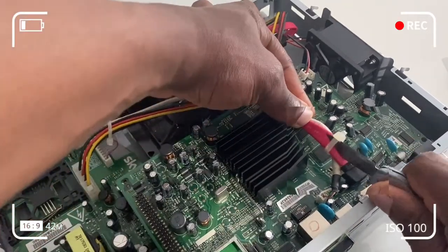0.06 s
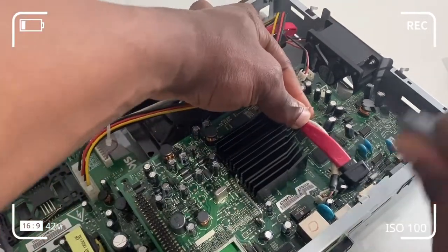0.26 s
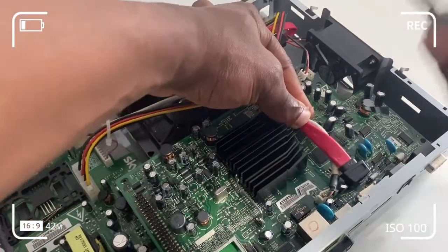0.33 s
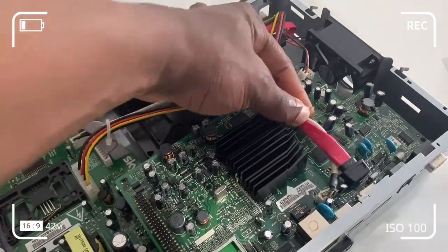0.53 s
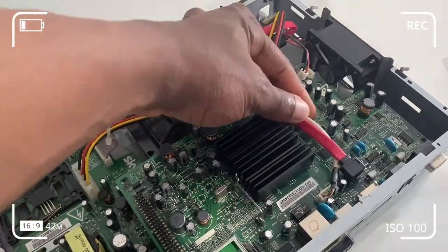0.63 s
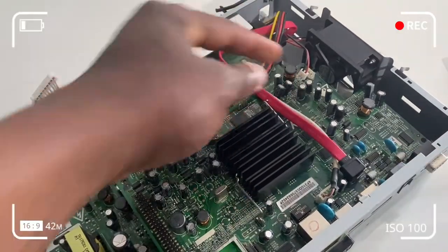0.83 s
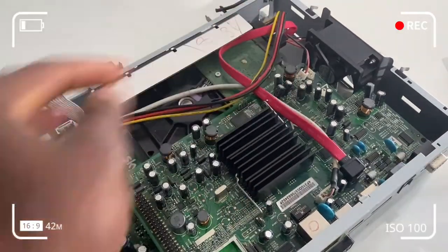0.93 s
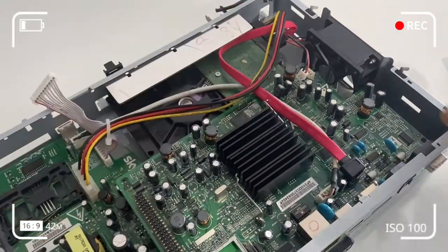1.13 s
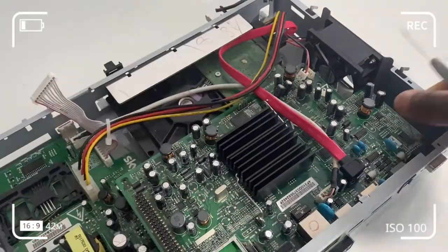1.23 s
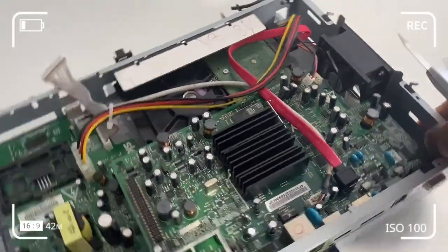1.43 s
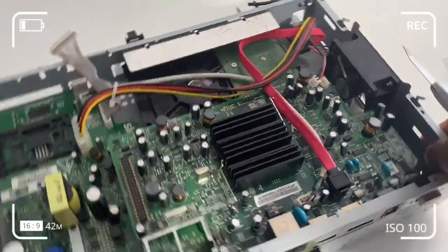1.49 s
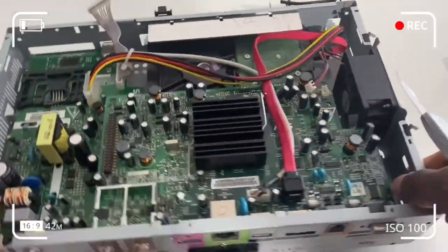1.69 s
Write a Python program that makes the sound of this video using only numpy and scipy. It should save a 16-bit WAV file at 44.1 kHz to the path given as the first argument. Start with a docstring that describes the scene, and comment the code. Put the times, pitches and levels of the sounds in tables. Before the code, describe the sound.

One hard crack of a cable tie parting in an open sheet-metal case, then faint brushing and taps on wires, tiny tool ticks, a short case slide and a low bump; close stereo microphone, short indoor reverberation.

```python
"""Cable tie cut in a metal case

A knife snaps a plastic cable tie inside an open sheet-metal case on a desk; fingers brush and tap wires,
the knife ticks, the case is pushed along and set down with a thud. Contacts are noise bursts plus decaying
case modes, rubbing is grainy noise, the desk is sagging modes, the small room a decaying noise tail.
A frequency-dependent phase turn spreads the sound to two channels.
"""
import sys
import numpy as np
from scipy import signal
from scipy.fft import rfft, irfft, next_fast_len
from scipy.io import wavfile
from scipy.ndimage import uniform_filter1d, map_coordinates

SR = 44100
rng = np.random.default_rng(int(sys.argv[2]) if len(sys.argv) > 2 else 0)


def store_wav(level_fs):
    """Save 16-bit WAV to argv[1]."""
    pcm = np.round(np.clip(np.atleast_2d(level_fs), -1, 1) * 32767)
    wavfile.write(sys.argv[1], SR, pcm.T.astype(np.int16))


def ratio_of_db(decibels):
    """Turn decibels (scalar or array-like) into linear amplitude factors; 0 dB maps to 1."""
    return 10 ** (np.asarray(decibels, float) / 20)


N = 77175
SPAN = 16384  # samples per event

# Noise spectrum of rubbing and scraping. Each row: frequency in Hz, relative density in dB per Hz.
HISS_SPECTRUM = [(200, -30.5), (350, 0.5), (900, -2.5), (6000, -13), (11400, -22.5), (15000, -27),
                 (16000, -50.5)]
# Phase between the channels. Each row: frequency in Hz, lead of the left in radians.
PHASE_TURN = [(0, 0), (200, -.1), (560, -1.1), (1700, 0), (2900, 1), (4200, .9), (5000, .2), (7000, 3),
              (8000, 3.3), (9700, 6.2), (11200, 6.3), (12900, 9.3), (14500, 9.6), (15800, 12.5)]


def unit(x):
    """Scales to rms 1."""
    return x / np.sqrt(np.mean(x ** 2) + 1e-20)


def peak(x):
    """Scales the loudest 2 ms to rms 1."""
    return x / np.sqrt(np.abs(uniform_filter1d(x ** 2, size=88)).max())


def along(points, hz):
    """Interpolates (Hz, value) points on a log frequency axis."""
    f, v = np.transpose(points)
    return np.interp(np.log(hz + 1), np.log(f + 1), v)


def filtered(x, response):
    """Applies a complex response of frequency in Hz."""
    m = next_fast_len(x.shape[-1] + 8192)
    spectrum = rfft(x, m) * response(np.fft.rfftfreq(m, 1 / SR))
    return irfft(spectrum, m)[..., :x.shape[-1]]


def wobble(knots_per_s):
    """A smooth random curve through normally distributed knots."""
    knots = rng.standard_normal(int(N * knots_per_s / SR) + 4)
    return map_coordinates(knots, [np.arange(N) * knots_per_s / SR])


def dying(t60_s):
    """Envelope with a submillisecond rise and a 60 dB fall per t60."""
    t = np.arange(SPAN) / SR
    return ratio_of_db(-60 * t / abs(t60_s)) * (1 - np.exp(-t / 0.00038))


def ringing(modes, tilt_db_per_octave):
    """One blow's answer: decaying sines at fresh levels, tilted about 2 kHz."""
    t = np.arange(SPAN) / SR
    out = np.zeros(SPAN)
    for hz, db, t60_s in modes:
        spread_db = 1.5 * rng.standard_normal()
        level_db = db + tilt_db_per_octave * np.log2(hz / 2000) + spread_db
        out += ratio_of_db(level_db - 60 * t / t60_s) * np.sin(2 * np.pi * hz * t)
    return out


def rattle(envelope):
    """A contact force: spiky noise under an envelope, energy 1."""
    spikes = ratio_of_db(2.4 * rng.standard_normal(SPAN))
    force = rng.standard_normal(SPAN) * spikes * envelope
    return force / np.linalg.norm(force)


def rubbing():
    """Grainy hiss of skin, wires and sliding feet over a fluctuating desk rumble."""
    # Hands and case sliding. Each row: time in seconds, hiss level in dB, rumble level before wobble in dB.
    strokes = [(0, -69.5, -66), (0.122, -77.5, -71.5), (.2, -78.5, -63.5), (0.451, -69.5, -67),
               (.66, -67, -64), (.82, -70.5, -66), (0.892, -84, -71.5), (1.212, -86, -79.5),
               (1.268, -50, -57.5), (1.448, -81.5, -56.5), (1.53, -70.5, -67), (1.75, -63.5, -68.5)]
    # Desk rumble spectrum. Each row: frequency in Hz, relative density in dB per Hz.
    rumble_spectrum = [(15, -28), (76, -0.5), (200, -9.5), (350, -13), (600, -43.5), (1500, -120)]
    s, hiss_db, rumble_db = np.transpose(strokes)
    t = np.arange(N) / SR
    grains = rng.standard_normal(N) * ratio_of_db(0.91 * wobble(220) + 1.2 * wobble(25))
    hiss = unit(filtered(grains, lambda hz: ratio_of_db(along(HISS_SPECTRUM, hz))))
    rumble = unit(filtered(rng.standard_normal(N), lambda hz: ratio_of_db(along(rumble_spectrum, hz))))
    rumble = rumble * ratio_of_db(3.6 * wobble(25))
    return ratio_of_db(np.interp(t, s, hiss_db)) * hiss + ratio_of_db(np.interp(t, s, rumble_db)) * rumble


def desk():
    """Soft pushes set desk-top modes booming; the pitch sags as the boom swells."""
    # Desk-top modes. Each row: settled frequency in Hz, level before tilt and spread in dB, t60 in seconds.
    desk_modes = [(66.6, -13, .2), (111, 5.5, 0.13), (151.5, -6.5, 0.086), (198, -8.5, 0.068)]
    # Pushes on the desk. Each row: start in seconds, gain in dB.
    thumps = [(0.234, -26.5), (0.259, -24.5), (0.323, -40), (0.697, -55), (1.283, -46), (1.421, -60),
              (1.7239, -20.5)]
    sag_lead_s, sag_settle_s = .0123, .0045  # phase gained, time constant
    out, t = np.zeros(N + SPAN), np.arange(SPAN) / SR
    hurried = (t + sag_lead_s * (1 - np.exp(-t / sag_settle_s))) * SR
    swell = (1 - np.exp(-t / 0.0069)) ** 2
    for s, db in thumps:
        boom = np.interp(hurried, np.arange(SPAN), ringing(desk_modes, -1))
        out[round(s * SR):][:SPAN] += ratio_of_db(db) * boom * swell
    return out[:N]


def knife():
    """The blade ticks against something hard: a broad click, and modes picked by the spot."""
    # Ticks. Each row: start in seconds, level in dB, favoured frequency in Hz.
    ticks = [(1.032, -55.5, 2272), (1.046, -61, 3886), (1.1153, -51.5, 6100), (1.118, -58, 5510)]
    # Blade modes. Each row: frequency in Hz, level before spot loss and spread in dB, t60 in seconds.
    blade_modes = [(2250, 0, .012), (3850, -2, .008), (5437, 0, .008), (5950, -2, .006), (9200, 0, .005),
                   (11500, -3, .005), (14420, -2, .05)]
    spot_loss_db_per_octave = 14.5
    click_db, click_t60_s = -3, 0.031
    out, t = np.zeros(N + SPAN), np.arange(SPAN) / SR
    rise = (1 - np.exp(-t / 0.00058)) ** 2
    for s, db, best_hz in ticks:
        modes = [(hz, level_db - spot_loss_db_per_octave * abs(np.log2(hz / best_hz)), t60_s)
                 for hz, level_db, t60_s in blade_modes]
        click = unit(np.diff(rng.standard_normal(SPAN + 1))) * dying(click_t60_s)
        ring = peak(ringing(modes, 0) * rise)
        out[round(s * SR):][:SPAN] += ratio_of_db(db) * (ring + ratio_of_db(click_db) * click)
    return out[:N]


def contacts():
    """Forces on the case crack or scrape directly and excite its modes; returns both parts."""
    # Sheet-metal modes. Each row: frequency in Hz, level before tilt and spread in dB, t60 in seconds.
    case_modes = [(689, 3, .08), (768, 0, .06), (865, -12, .04), (1077, -14, .03), (1350, -10, .025),
                  (1724, -8, .02), (1900, -5, .03)]
    # Direct sound of a blow, before tilt. Each row: frequency in Hz, response in dB.
    crack_spectrum = [(300, -41), (520, -20.5), (680, -11), (5000, -9.5), (9800, -17.5), (15400, -26.5)]
    # Blows: the tie snapping, then taps. Each row: start in seconds, level in dB, crack t60 in seconds,
    # tilt in dB per octave, ring over crack in dB.
    snap = [(0.2329, -11.5, 0.017, 8.5, 0.5), (.2345, -11.5, 0.021, 0, 2.5),
            (.238, -12.5, 0.056, 0.5, -6.5)]
    taps = [(.591, -51, 0.023, -5, -5.5), (.597, -54, 0.17, -2.5, -14.5), (0.633, -55.5, 0.032, -0.5, -11),
            (.679, -63.5, 0.011, 6, 14), (.69, -49.5, 0.049, -6.5, -4.5), (.759, -51.5, 0.019, 7, -2.5),
            (0.767, -40.5, 0.022, -2.5, -16.5), (.772, -46.5, 0.07, -6.5, -9),
            (1.357, -43.5, 0.04, -3.5, -21), (1.396, -32.5, 0.033, 0, -10.5), (1.722, -49, 0.033, 3.5, 1),
            (1.743, -45.5, 0.049, -4, 11.5)]
    # Swelling brushes and scrapes. Each row: start in seconds, level in dB, rise in seconds,
    # tilt in dB per octave, ring over scrape in dB.
    scrapes = [(0.506, -59.5, 0.0076, 2.5, -11.5), (.815, -63.5, 0.0073, -3, 0.5),
               (1.227, -58.5, 0.011, 0, -8), (1.246, -43.5, 0.0079, 4.5, -17.5),
               (1.269, -46.5, 0.0075, 2.5, -18), (1.3, -56.5, 0.017, 6.5, 0), (1.358, -55, 0.013, 10.5, 10),
               (1.381, -48.5, 0.014, 0.5, 9), (1.421, -57, 0.011, 7, -19), (1.605, -65, 0.0076, 0, -9),
               (1.724, -43, 0.011, -2, -23)]
    out, t = np.zeros((2, N + SPAN)), np.arange(SPAN) / SR

    def swelling(rise_s):
        """Rises to a crest at rise_s and fades, roughened at random."""
        return t / rise_s * np.exp(1 - t / rise_s) * ratio_of_db(1.44 * wobble(247)[:SPAN])

    # a blow's force follows the cube of its crack envelope
    blows = [(row, dying(row[2]), crack_spectrum, 3) for row in snap + taps]
    swells = [(row, swelling(row[2]), HISS_SPECTRUM, 1) for row in scrapes]
    no_bass = signal.butter(3, 400, "high", fs=SR)
    for (s, db, _, tilt_db, ring_db), shape, colour, power in blows + swells:
        noise = filtered(rattle(1), lambda hz: ratio_of_db(along(colour, hz) + tilt_db * np.log2((hz + 50) / 2000)))
        crack = signal.lfilter(*no_bass, unit(noise) * shape)
        force = rattle(shape ** power)
        ring = peak(signal.fftconvolve(force, ringing(case_modes, tilt_db))[:SPAN])
        out[:, round(s * SR):][:, :SPAN] += ratio_of_db(db) * np.array([crack, ratio_of_db(ring_db) * ring])
    return out[:, :N]


def room(x):
    """Reverberation: a noise tail after 3.4 ms, each frequency dying at its own speed."""
    # Room decay. Each row: frequency in Hz, t60 in seconds.
    decay = [(100, 0.12), (700, 0.27), (3000, .3), (12000, 0.21)]
    hz, t, z = signal.stft(rng.standard_normal(SR // 2), SR, nperseg=256)
    fading = z * ratio_of_db(-60 * t / along(decay, hz)[:, None])
    tail = signal.istft(fading, SR, nperseg=256)[1]
    return signal.fftconvolve(np.pad(x, (150, 0)), tail / np.linalg.norm(tail))[:N]


def scene():
    """One sound field; a small part differs between channels, least where they are in or out of phase."""
    room_db, unlike_db = -13.5, -1.5
    ring_in_room_db = -4  # the ring reaches the walls less than the crack
    crack, ring = contacts()
    rest = crack + knife() + desk()
    sent = ratio_of_db(room_db) * (rest + ratio_of_db(ring_in_room_db) * ring)
    mono = rest + ring + room(sent) + rubbing()
    f, turn = np.transpose(PHASE_TURN)
    apart = filtered(room(sent) + rubbing(), lambda hz: np.sin(np.interp(hz, f, turn)))
    return mono + ratio_of_db(unlike_db) * apart * np.array([[1], [-1]])


def low_pass(x):
    """Removes everything above the highest recorded frequency."""
    return signal.sosfilt(signal.butter(12, 16870, fs=SR, output="sos"), x)


def record(dry):
    """Phase turn and level lean between the channels, band limit, soft ceiling."""
    # Level balance. Each row: frequency in Hz, left over right in dB.
    lean = [(300, 0), (800, -5), (1300, -4.5), (1800, -1.5), (6000, 0)]
    top_hz, ceiling = 15950, .95
    f, turn = np.transpose(PHASE_TURN)

    def spread(hz):
        """Half the turn and lean to the left, the opposite half to the right."""
        half = (1j * np.interp(hz, f, turn) + np.log(ratio_of_db(along(lean, hz)))) / 2
        return np.exp(np.array([half, -half])) * (hz < top_hz)

    wide = filtered(dry, spread)
    wide = wide / (1 + np.abs(wide / ceiling) ** 4) ** .25
    return low_pass(wide)


dry = scene()
out = record(dry)
store_wav(out)
```